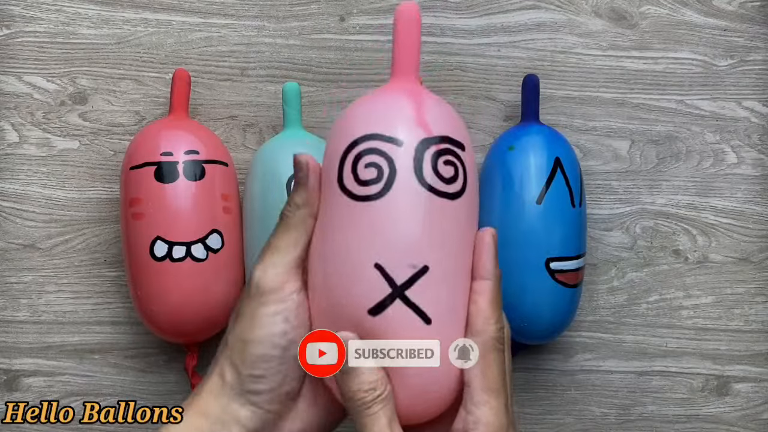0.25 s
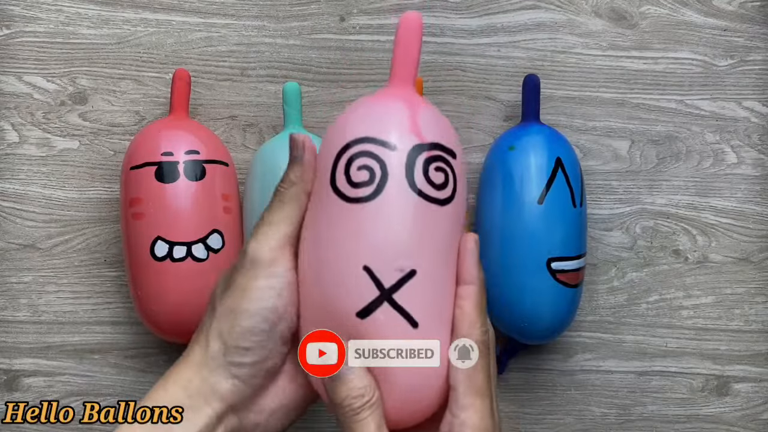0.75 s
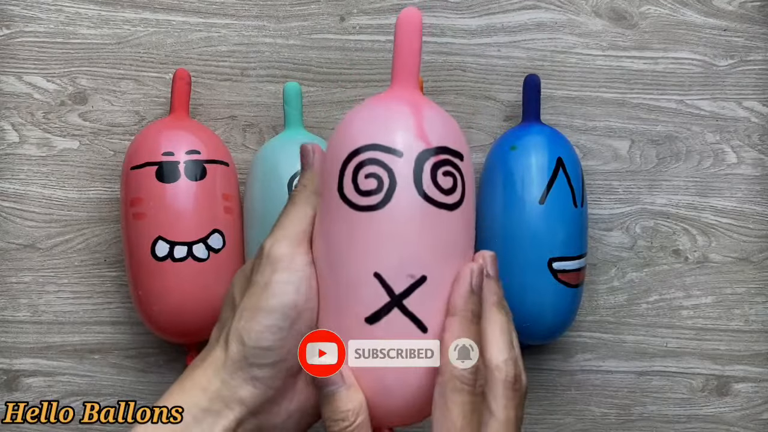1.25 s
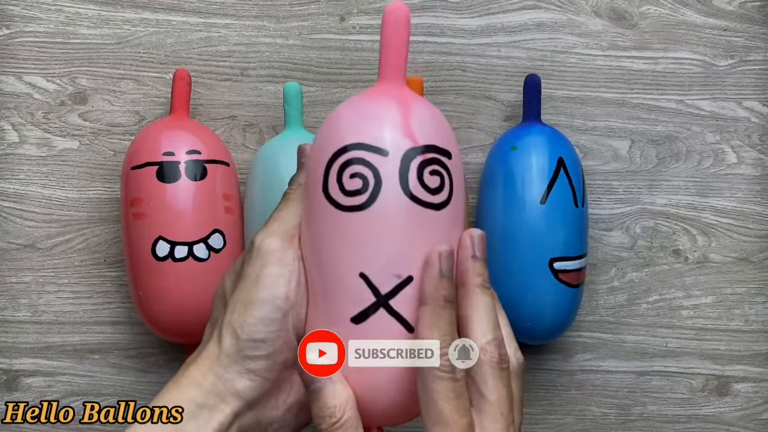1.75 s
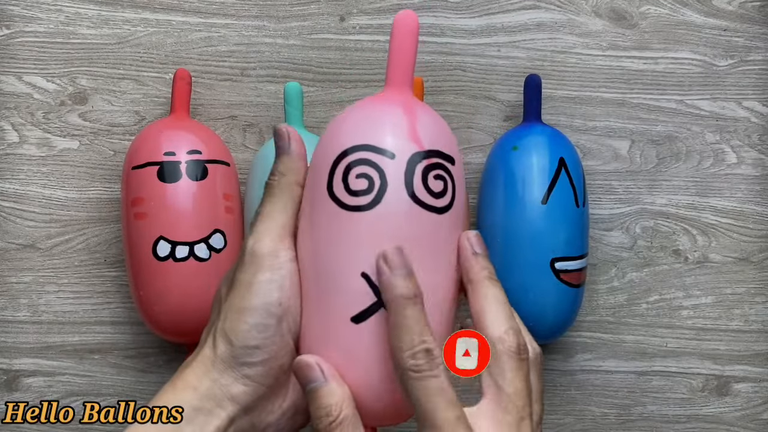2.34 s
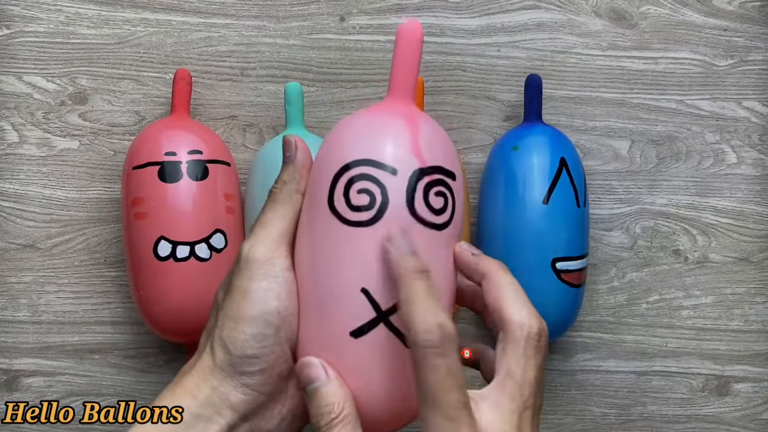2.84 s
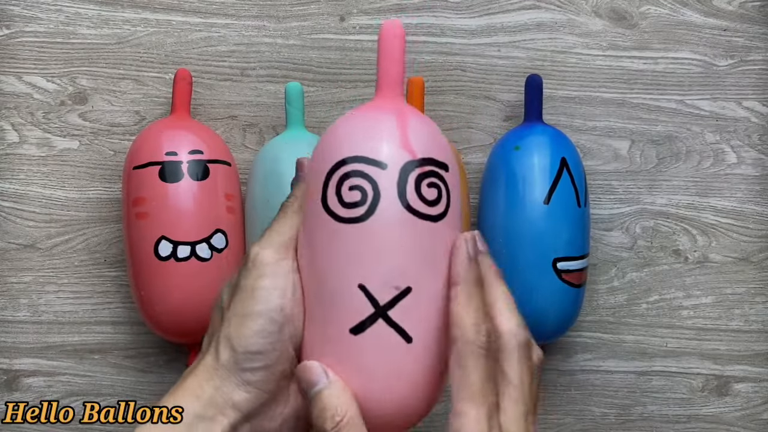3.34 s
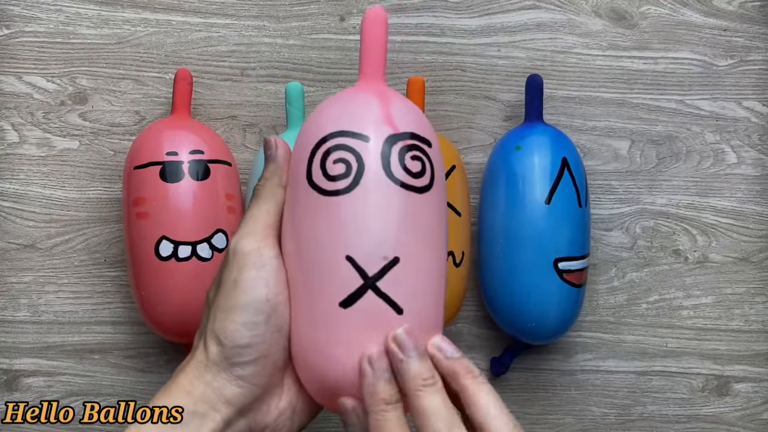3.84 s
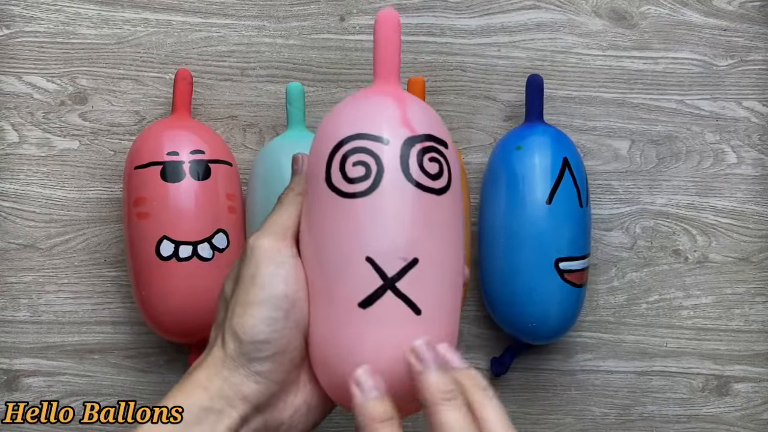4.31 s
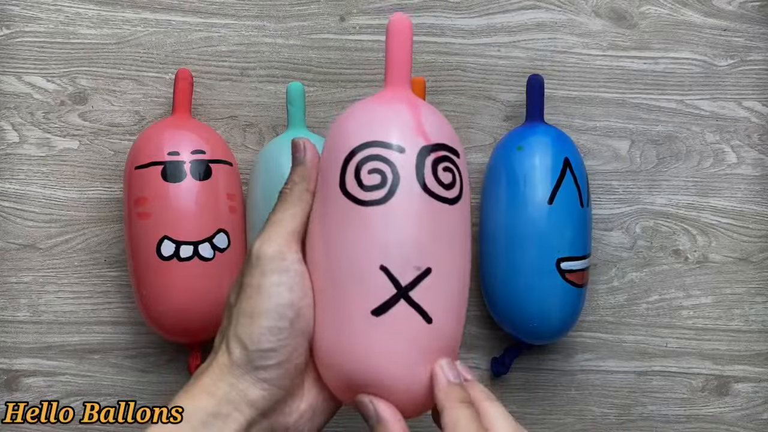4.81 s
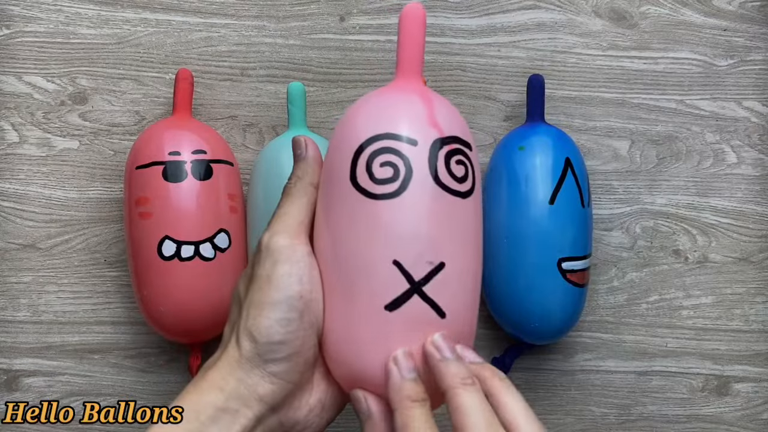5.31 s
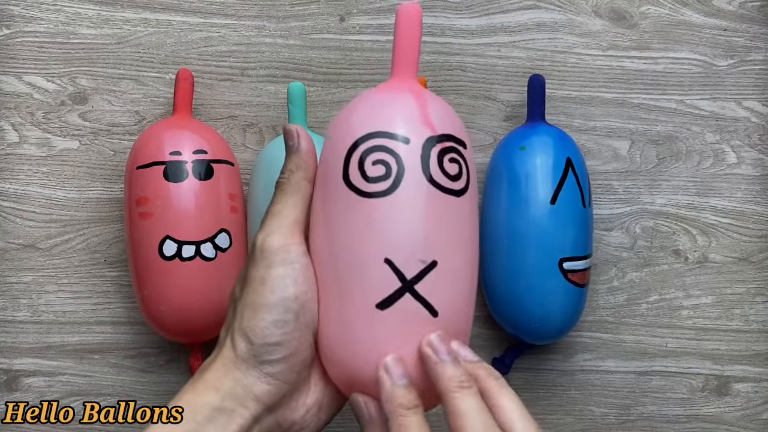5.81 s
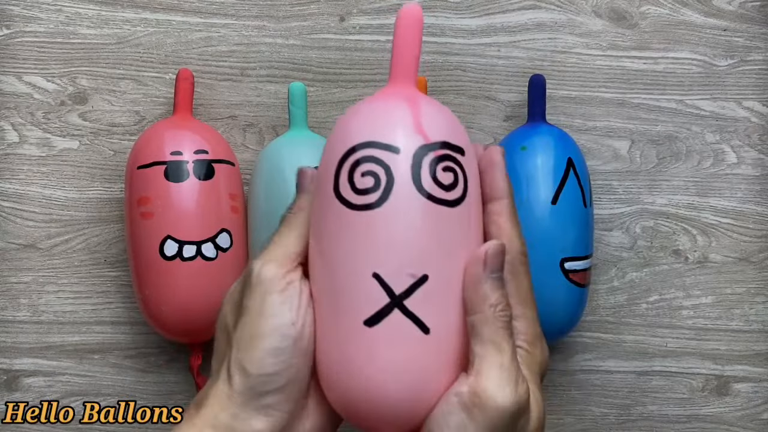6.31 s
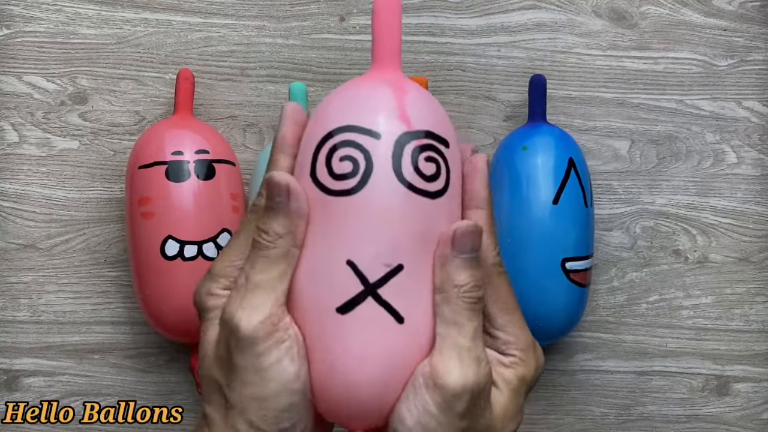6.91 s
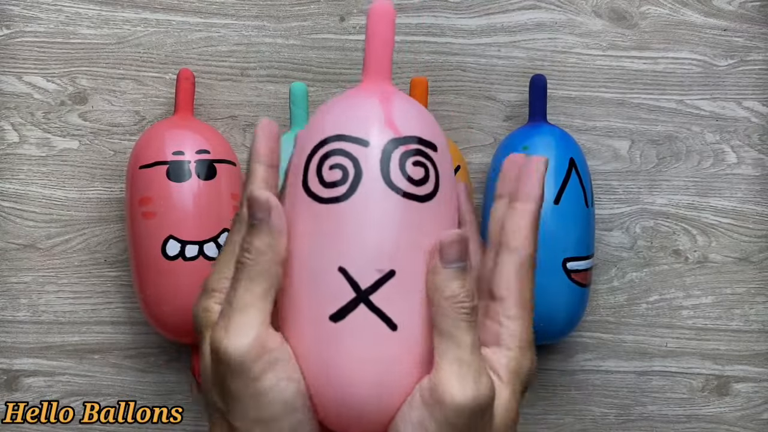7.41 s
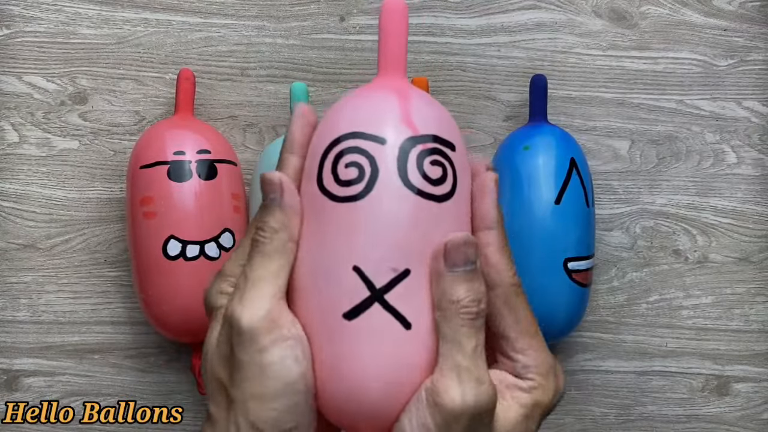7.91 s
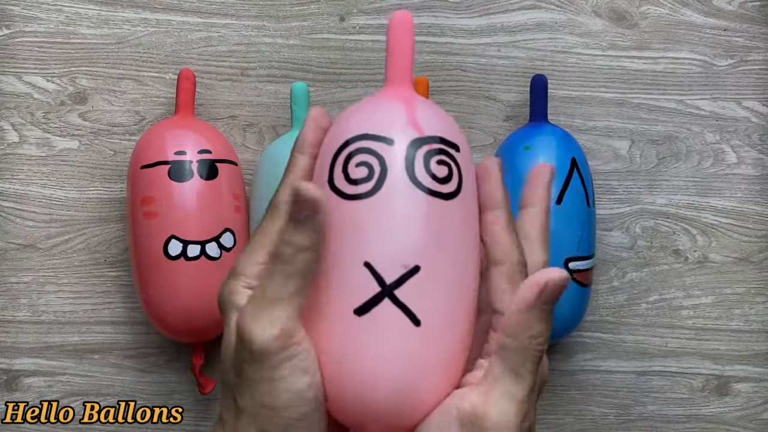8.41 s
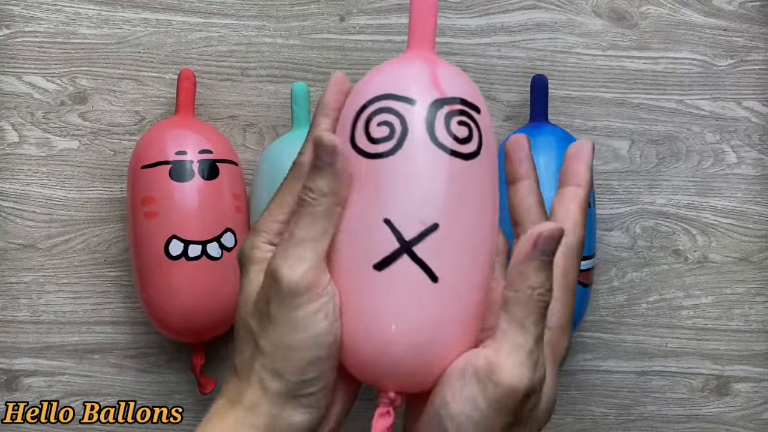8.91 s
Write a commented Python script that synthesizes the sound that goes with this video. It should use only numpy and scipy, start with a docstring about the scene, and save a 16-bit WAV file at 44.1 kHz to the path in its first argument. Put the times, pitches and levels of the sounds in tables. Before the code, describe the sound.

Fingers rub and squeeze a taut latex balloon up close, giving rubbery stuttering creaks, blunt knocks and short squeaks in irregular bursts, in a small dry room.

```python
"""Two hands squeeze and rub a taut latex balloon just below a stereo microphone in a small, dry room.
Rubs come first: fast, slowing runs of finger slips with fine crackle. Soft creaks and a low rumble run throughout.
Single slips soon join in. Each sends a wave round the skin, treble first: a tiny falling chirp, or a blunt knock.
From 1.5 s light fingertips squeak in gliding notes, and from 2.5 s skin peeling loose adds a few thin ticks.
Rubs and slips mix until the end, with slips leading from 7.7 s; the balloon and the air inside ring briefly."""
import sys
import numpy as np
from scipy import signal
from scipy.fft import rfft, irfft, next_fast_len
from scipy.io import wavfile
from scipy.ndimage import uniform_filter1d

SR = 44100
rng = np.random.default_rng(int(sys.argv[2]) if len(sys.argv) > 2 else 0)


def log_audio(samples):
    """Write samples as a 16-bit WAV file to the path given in sys.argv[1]."""
    # one column per channel
    frames = np.atleast_2d(samples).T
    # limit to full scale, then quantise
    limited = np.clip(frames, -1, 1)
    pcm = np.round(limited * 32767).astype(np.int16)
    wavfile.write(sys.argv[1], SR, pcm)


N = 403497
T = np.arange(N) / SR  # s
SIZE = 4096  # samples in a short sound or filter
TOP_HZ = 15600  # nothing is wanted above this


def amp(db):
    """Turn decibels into a gain."""
    return 10 ** (np.asarray(db) / 20)


def unit(x):
    """Scale to an rms of one."""
    return x / np.sqrt(np.mean(x ** 2))


def peak(x):
    """Scale to a peak of one."""
    return x / np.abs(x).max()


def curves(table, t=T):
    """Join the points of each table column by straight lines in time."""
    s, *columns = np.transpose(table)
    return [np.interp(t, s, c) for c in columns]


def add(out, start, x):
    """Mix x into out from a time in seconds."""
    i = max(int(start * SR), 0)
    out[..., i:i + x.shape[-1]] += x[..., :max(N - i, 0)]


def ring(x, response):
    """Pass x through an impulse response."""
    return signal.oaconvolve(x, response)[:len(x)]


def butter(order, hz, kind):
    """Make a smooth filter that keeps the low, high or middle notes."""
    return signal.butter(order, hz, kind, fs=SR, output="sos")


def colour(points):
    """Make an impulse response with a given spectrum that starts at once (minimum phase)."""
    hz, db = np.transpose(points)
    f = np.arange(SIZE // 2 + 1) * SR / SIZE
    gain = amp(np.interp(np.log(f + 1), np.log(hz), db))
    # folding the cepstrum forward removes everything before the start
    cepstrum = irfft(np.log(gain))
    cepstrum[1:SIZE // 2] *= 2
    cepstrum[SIZE // 2 + 1:] = 0
    return irfft(np.exp(rfft(cepstrum)))


def even(x, span_s=0.037):
    """Hold the short-term level near one and keep the finer grain."""
    power = np.abs(uniform_filter1d(x ** 2, int(span_s * SR)))
    return x / np.sqrt(power + np.mean(x ** 2) / 100)


# spectrum of the room's rumble: f/Hz, relative level/dB
ROOM_TONE = [(15, -31.5), (25, 15.5), (77, 8.5), (163, -1.5), (404, -4.5), (501, -11), (673, -10.5),
             (1420, -31.5), (6040, -40.5), (8550, -47.5), (9770, -38.5), (15000, -60.5)]


def room_tone(level_db=-53.5, side_db=-11, low_cut_hz=45):
    """The quiet rumble of the room: coloured noise, nearly alike on both sides."""
    response = signal.sosfilt(butter(4, low_cut_hz, "high"), colour(ROOM_TONE))
    mid, side = (unit(ring(rng.standard_normal(N), response)) for _ in range(2))
    return amp(level_db) * (mid + amp(side_db) * np.outer([1, -1], side))


def room(x, wet_db=-14, t60=0.25, bright_db=-10, bright_t60=0.16, split_hz=1500):
    """A short tail of fading noise, different at each microphone; the walls send back more treble than bass."""
    t = T[:SR // 2]
    low_pass = butter(2, split_hz, "low")
    out = []
    for noise in rng.standard_normal((2, len(t))):
        low = signal.sosfilt(low_pass, noise)
        tail = 0
        for band, db, seconds in (low, wet_db, t60), (noise - low, bright_db, bright_t60):
            fade = np.exp(-np.log(1000) * t / seconds) * (t > .004)
            tail = tail + amp(db) * band * fade / np.linalg.norm(fade)
        out.append(ring(x, tail))
    return np.array(out)


# where the fingers work: t/s, head start of the low notes on the left/ms, left minus right level/dB
# (the level difference holds in full only for the upper middle)
PLACE = [(0, 0.11, 4.5), (2.4, 0.15, 4.5), (5.3, 0.13, 3), (8.2, 0.1, 2.5)]


def microphones(x, split_hz=1800, near_low_hz=920, near_high_hz=5000, bass_pan=0.19):
    """Low notes reach the left first; treble leaves the whole skin, a quarter cycle apart between sides."""
    lead_ms, pan_db = curves(PLACE)
    low = signal.sosfiltfilt(butter(2, split_hz, "low"), x)
    treble = signal.hilbert(x - low, next_fast_len(N))[:N]
    later = np.interp(T - lead_ms / 1000, T, low)
    pair = np.array([low + treble.real, later + treble.imag])
    # the upper middle favours the nearer microphone most; the rest gets only a share of the difference
    middle = signal.sosfiltfilt(butter(2, [near_low_hz, near_high_hz], "band"), pair)
    side_db = np.array([pan_db, -pan_db]) / 2
    return middle * amp(side_db) + (pair - middle) * amp(bass_pan * side_db)


# lasting notes of the balloon and the air inside: f/Hz, time to fall by 60 dB/s, relative level/dB
RINGS = [(251.6, 0.34, -4), (418.5, 0.16, -2), (709, 0.14, -11.5), (1568, 0.19, 3), (2895, 0.2, -0.5),
         (3130, 0.35, -5), (5200, 0.29, -0.5)]


def cavity(x):
    """The balloon and its air ring on at a few fixed notes, each dying away at its own pace."""
    t = T[:SR // 3]
    response = 0
    for hz, t60, db in RINGS:
        decay = np.log(1000) / t60
        note = np.exp(-decay * t) * np.cos(2 * np.pi * hz * t)
        response = response + amp(db) * 2 * decay / SR * note
    return ring(x, response)


# how tightly the skin is stretched: t/s, shift of its resonances/semitones
TENSION = [(.04, -1), (.11, 1), (.2, -1.5), (.45, -0.2), (.63, -0.77), (.69, 1.3), (.76, -1), (.82, 0.4),
           (2.1, 0), (4.1, 1), (5.2, .5), (5.9, 1), (6.8, -1), (7.1, -1.5), (7.3, 0), (7.9, -0.17)]


def tension(t):
    """The factor by which the stretch of the skin raises its resonances."""
    return 2 ** (curves(TENSION, t)[0] / 12)


def wave(shape, shift=.1, patchy_db=3.0, turns=1.6, scatter=0.2164, knee_hz=70, lap=4.4, lap_db=-11):
    """One slip crosses the skin: each spot has its own tension and colour, and low notes travel slowest."""
    hz, db = np.transpose(shape)
    spot_hz = hz * np.exp(shift * rng.standard_normal())
    spot_db = db + patchy_db * rng.standard_normal(len(db))
    spot = colour(np.c_[spot_hz, spot_db])
    f = np.arange(SIZE // 2 + 1) * SR / SIZE
    # a phase that grows with log frequency delays the bass most
    phase = 2 * np.pi * turns * np.exp(scatter * rng.standard_normal()) * np.log(1 + f / knee_hz)
    first = np.exp(-1j * phase)
    # the wave comes round once more, weaker and more drawn out
    again = amp(lap_db) * np.exp(-1j * lap * phase)
    return unit(irfft(rfft(spot) * (first + again)))


# typical spectrum of the taut skin, in creaks and in rubs: f/Hz, relative level/dB
SKIN = [(150, -25), (330, -8.5), (425, -1), (505, -11.5), (610, 10), (760, 3), (950, -7.5), (1350, -28.5),
        (1590, -25), (1900, -34), (2800, -34), (4000, -42.5), (12000, -90.5)]


def creaks(level_db=-45, spread_db=3, per_s=14, swell_s=0.0023):
    """The holding hand never rests: short puffs of noise shake the skin softly at random moments."""
    out, t = np.zeros(N), T[:SIZE]
    swell = t / swell_s * np.exp(-t / swell_s)
    for along, size in rng.random((int(per_s * N / SR), 2)):
        creak = ring(swell * rng.standard_normal(SIZE), wave(SKIN, shift=0.088, patchy_db=0.0))
        add(out, along * T[-1], amp(level_db + spread_db * (2 * size - 0.5)) * peak(creak))
    return out


# sticky skin peeling off the latex: t/s, peak level/dB
PEELS = [(2.4978, -35), (8.0719, -44), (8.2626, -35), (8.322, -44)]


def peels(tick_s=0.0018, low_hz=9000):
    """Skin that comes unstuck gives a thin, very high tick: a brief swell of noise without its lows."""
    out, t = np.zeros(N), T[:SIZE]
    high_pass = butter(4, low_hz, "high")
    for s, db in PEELS:
        swell = t / tick_s * np.exp(-t / tick_s)
        tick = signal.sosfilt(high_pass, swell * rng.standard_normal(SIZE))
        add(out, s, amp(db) * peak(tick))
    return out


# spectrum of the crackle of the contact: f/Hz, relative level/dB
CRACKLE = [(300, -13.5), (1250, 19), (1600, -2), (1950, 10), (2400, 9.5), (2900, 8.5), (3700, 1.5),
           (6000, -0.5), (8300, -9), (10000, -3), (12200, -23), (14000, -8.5), (16000, -30.5)]


def crackle_colour():
    """The filter that gives noise the sound of skin catching on latex."""
    return colour(CRACKLE)


# fingertip squeaks: t/s, length/s, starting f/Hz, final f/Hz, level/dB,
# overtone fall/dB per octave, rasp level against the note/dB
SQUEAKS = [(1.547, 0.009, 854, 1630, -45.5, 15, -6), (1.885, 0.01, 990, 1800, -47.5, 5, -4),
           (2.247, 0.011, 1680, 2250, -52, 3.5, -8), (3.173, .011, 952, 1411, -44.5, 6.5, -18),
           (3.234, 0.011, 1600, 3794, -46, 1.5, -11), (3.413, 0.056, 608, 1600, -43, 11, -12),
           (3.461, 0.047, 540, 1414, -39, 9, -17), (4.226, 0.029, 954, 1644, -47.5, 13, -16),
           (4.471, 0.03, 1895, 1703, -50, 12, -5.5), (5.583, 0.038, 1440, 1723, -47.5, 17, -11.5),
           (5.654, 0.033, 1045, 515, -44, 13, -17), (6.022, 0.012, 657.4, 1160, -41.5, 7, -8),
           (6.318, 0.049, 2145, 2068, -48, 25, -0.5), (6.409, 0.016, 5870, 4537, -50.5, -21, 6.5),
           (8.483, 0.0064, 4080, 2720, -53.5, 12, 7)]


def squeaks(rough=0.11, shimmer=0.23, mellow_hz=4500, count=5):
    """Light, fast slips make a gliding, hoarse note that rasps once a cycle; latex swallows high overtones."""
    out, crackle = np.zeros(N), crackle_colour()
    for s, length, first_hz, last_hz, db, fall_db, rasp_db in SQUEAKS:
        u = np.linspace(0, 1, int(length * SR))
        chance = rng.standard_normal((3, SIZE))[:, :len(u)]
        waver, grip = unit(uniform_filter1d(chance[:2], SR // 1000))
        # the raspier the note, the less steady its pitch
        hz = (first_hz + (last_hz - first_hz) * u) * np.exp(rough * np.sqrt(amp(rasp_db)) * waver)
        phase = 2 * np.pi * np.cumsum(hz) / SR
        note = 0
        for k in range(1, count + 1):
            swallowed = (k * hz < TOP_HZ) / (1 + (k * hz / mellow_hz) ** 4)
            note = note + amp(-fall_db * np.log2(k)) * np.sin(k * phase) * swallowed
        rasp = ring(chance[2] * (1 + np.cos(phase)), crackle)
        swell = unit(np.sqrt(u * (1 - u)) * np.exp(shimmer * grip))
        add(out, s, amp(db) * swell * (unit(note) + amp(rasp_db) * unit(rasp)))
    return out


# rubbing strokes: t/s, attack/s, hold/s, relative skin level/dB, swell over the hold/dB,
# relative deep wobble level/dB, relative crackle level/dB, top rate of slips/per s (typical), irregularity/0-1
RUBS = [(0.0, 0.051, 0.15, -25.5, -10.5, -30, -60, 345, 0.18),
        (0.324, 0.023, 0.05, -30.5, -5.5, -46, -80, 280, 0.5),
        (0.599, 0.033, 0.15, -26.5, -15.5, -27, -64.5, 391, .14),
        (0.769, 0.038, 0.019, -22.5, 0.5, -25, -75, 224, 0.39),
        (0.93, 0.014, 0.3, -66, 1, -72, -75, 360, 0.3),
        (2.463, 0.024, 0.0073, -30.5, 10.5, -37.5, -44.5, 303, 0.54),
        (2.704, 0.013, 0.0046, -32.5, -6, -47, -52.5, 307, 0.62),
        (3.112, 0.0067, 0.0096, -29, -3, -42, -57, 392, 0.39),
        (3.732, 0.015, 0.037, -30.5, 11, -37.5, -57, 437, 0.42),
        (3.835, 0.0097, 0.15, -35, 13, -38.5, -61.5, 320, 0.46),
        (4.093, 0.0072, 0.05, -25.5, 0.5, -39, -51, 377, 0.46),
        (4.22, 0.021, 0.015, -36.5, -8.5, -51, -54, 285, 0.4),
        (4.55, 0.013, 0.15, -33, -1, -37, -53.5, 289, 0.51),
        (4.731, .011, 0.074, -23.5, -9, -30, -50.5, 309, 0.42),
        (5.133, 0.014, 0.043, -35, 9.5, -45, -59.5, 226, 0.43),
        (5.211, 0.0096, 0.085, -29.5, 0, -38.5, -57, 227, 0.35),
        (5.35, 0.024, 0.079, -26.5, 6, -33.5, -52, 218, 0.46),
        (5.804, .02, 0.11, -25, -3, -31.5, -49, 273, 0.41),
        (5.931, 0.01, 0.049, -39, -12, -61, -56.5, 223, 0.4),
        (6.086, .012, .15, -40.5, -16, -44, -68.5, 260, 0.45),
        (6.286, 0.025, 0.038, -29, -5, -42.5, -74, 366, 0.34),
        (6.387, 0.028, 0.13, -59.5, -23, -53.5, -72.5, 326, 0.38),
        (6.8, 0.017, 0.075, -34.5, -3, -37.5, -67, 202, 0.61),
        (6.899, 0.011, 0.25, -34, 9, -44.5, -62, 320, 0.62),
        (7.163, 0.012, 0.063, -36, 6, -40, -60.5, 243, 0.57),
        (7.345, 0.015, 0.046, -46.5, -7, -52, -66, 224, 0.63),
        (7.456, .02, 0.041, -48, -8, -48.5, -71, 217, 0.58),
        (7.997, 0.011, 0.098, -58, 3, -54, -71.5, 176, 0.68),
        (8.949, 0.0096, 0.096, -46.5, -1, -52, -77.5, 228, 0.7)]


def drag(t=T, rush_share=.36, rush_octaves=.45, sag_octaves_per_s=8.5):
    """Slips a second and their irregularity: a finger speeds up early in the hold, then slows as it digs in."""
    points = []
    for s, attack, hold, *_, rate, uneven in RUBS:
        rush = rush_share * hold
        last_rate = rate / 2 ** (sag_octaves_per_s * (hold - rush))
        points += [(s + attack, rate / 2 ** rush_octaves, uneven),
                   (s + attack + rush, rate, uneven),
                   (s + attack + hold, last_rate, uneven)]
    return curves(sorted(points), t)


def catching(depth_db=5.0, span_s=0.012):
    """An uneven drag catches and eases, so its level wanders in small separate grains."""
    span = int(span_s * SR)
    wander = unit(uniform_filter1d(uniform_filter1d(rng.standard_normal(N), span), span))
    return amp(depth_db * drag()[1] * np.clip(wander, -2, 1.5))


def strokes(attack_db=19.5, release_db_per_s=855, wobble_edge=0.96, wobble_swell=0.41,
            crackle_swell=0.36, breakup_db=30, smooth_below=0.25):
    """Levels of skin, wobble and crackle: attack, sloping hold, release; a smooth drag gains crackle."""
    gains = np.zeros((3, N))
    for s, attack, hold, skin_db, swell_db, wobble_db, crackle_db, _, uneven in RUBS:
        t = T[:SR // 2] - attack
        edge_db = attack_db * np.minimum(t / attack, 0) - release_db_per_s * np.maximum(t - hold, 0)
        along = np.clip(t / hold, 0, 1) - .5
        breakup = breakup_db * max(1 - uneven / smooth_below, 0)
        skin = skin_db + edge_db + swell_db * along
        wobble = wobble_db + wobble_edge * edge_db + wobble_swell * swell_db * along
        crackle = crackle_db + edge_db + (crackle_swell * swell_db + breakup) * along
        add(gains, s, amp([skin, wobble, crackle]))
    return uniform_filter1d(gains, SR // 400) * catching()


def stick_slip(scatter_db=3.0):
    """The finger sticks and lets go at uneven intervals; a longer hold gives a stronger slip."""
    rate, uneven = drag()
    pulses, i = np.zeros(N), 0
    for gap, size in rng.standard_normal((N // 50, 2)):
        hold = np.exp(uneven[i] * np.clip(gap, -2, 2))
        i += int(hold * SR / rate[i]) + 1
        if i >= N:
            break
        pulses[i] = np.sqrt(hold) * amp(scatter_db * uneven[i] * size)
    return pulses


def roam(pulses, shape, count=24, hop=1.4, wide_drag=.4):
    """Each slip sounds from the spot under the finger; uneven drags hop further, tighter skin rings higher."""
    spots = [wave(shape, shift=0.13 * far, patchy_db=6.9 * far, scatter=0.2946 * far)
             for far in np.linspace(.1, 1.1, count)]
    at = np.flatnonzero(pulses)
    uneven = drag(T[at])[1]
    hops, places = rng.random((N // 50, 2))[:len(at)].T
    visits = np.cumsum(hops < hop * uneven) % len(at)
    # an even drag stays near the middle
    reach = np.clip(uneven / wide_drag, 0, 1) ** 2
    chosen = (count * places[visits] * reach).astype(int)
    out = np.zeros(N)
    steps = np.arange(SIZE)
    for i, spot, taut in zip(at, chosen, tension(T[at])):
        add(out, T[i], pulses[i] * np.interp(steps * taut, steps, spots[spot], right=0))
    return even(out, span_s=0.026)


# change of the crackle's top octave, higher under a flat palm than under fingertips: t/s, level/dB
SHEEN = [(.15, 4.5), (1.15, 15), (2.5, 6), (4.7, -1), (5.9, -0.5), (6.3, 23.5), (6.9, 4), (8.9, 24)]


def sheen(x, split_hz=8500):
    """Raise or lower the very top of the crackle."""
    top = signal.sosfiltfilt(butter(2, split_hz, "high"), x)
    return x + (amp(curves(SHEEN)[0]) - 1) * top


# typical spectrum of the wobble of the whole balloon: f/Hz, relative level/dB
WOBBLE = [(25, -34), (55, -10), (105, 3), (240, 2.5), (390, 0.5), (520, -19), (900, -58), (4000, -77.5)]
# typical spectrum of the skin's bark under a hard fingertip: f/Hz, relative level/dB
BARK = [(300, -50.5), (800, -9), (1080, 8), (1350, -4), (1650, 3), (2000, -22.5), (2700, -27.5), (2950, -8),
        (3700, -33), (8000, -49)]
# the bark against the skin: t/s, relative level/dB
BARK_LEVEL = [(0, -12), (.065, -15), (.12, -21), (.4, -16.5), (.7, -19.5), (3.1, -22.5), (4.1, -14),
              (4.7, -12.5), (5.4, -16), (5.9, -14), (6.85, -23.5), (7.15, -12.5), (7.8, -16), (8.7, -19.5)]


def rubs(skin_db=-0.36, crackle_db=6.5, burst_s=0.0065, grain_db=4.5, low_cut_hz=115):
    """Runs of slips, too quick to stir the deepest wobble, drive the skin; each sheds a burst of crackle."""
    skin_gain, wobble_gain, crackle_gain = strokes()
    pulses = stick_slip()
    bursts = ring(pulses, np.exp(-T[:SIZE] / burst_s))
    grains = rng.standard_normal(N) * amp(grain_db * np.minimum(rng.exponential(size=N), np.pi))
    crackle = sheen(even(ring(grains * bursts, crackle_colour())))
    skin = roam(pulses, SKIN)
    wobble = signal.sosfilt(butter(4, low_cut_hz, "high"), roam(pulses, WOBBLE))
    body = amp(skin_db) * skin_gain * skin + wobble_gain * wobble
    bark = amp(curves(BARK_LEVEL)[0]) * skin_gain * roam(pulses, BARK)
    return body + bark + amp(crackle_db) * crackle_gain * crackle


# high notes that a snap leaves ringing in the stretched latex:
# typical f/Hz, time to fall by 60 dB/s, relative level/dB
PINGS = [(1653, 0.11, -0.5), (3003, 0.053, -11)]


def ping(spread_db=4.0, detune=.018):
    """The high notes of the latex fade away; their balance and tuning change with every grip."""
    t = T[:SIZE]
    chance = rng.standard_normal((len(PINGS), 2))
    out = 0
    for (hz, t60, db), (size, stretch) in zip(PINGS, chance):
        fade = amp(db + spread_db * size - 60 * t / t60)
        out = out + fade * np.sin(2 * np.pi * hz * (1 + detune * stretch) * t)
    return out


# single slips of a finger: t/s, peak level of the skin/dB, grip/0-1, relative snap level/dB
SLIPS = [(.326, -27, 0.46, -49), (0.343, -20, 0.57, -48), (.376, -20.5, 0.7, -48),
         (0.414, -20.5, 0.76, -45.5), (0.427, -22, 0.44, -58), (0.446, -20, 0.6, -50.5),
         (0.461, -19, 0.27, -68), (0.481, -16, 0.59, -45), (.806, -15.5, 0.57, -45), (.823, -19, 0.17, -47),
         (0.864, -16.5, 0.78, -53), (0.907, -17, 0.73, -53.5), (1.14, -33.5, 0.45, -45),
         (1.172, -21, 0.98, -60), (1.18, -16, 0.82, -45), (1.215, -16.5, 0.93, -47.5),
         (1.254, -16, 0.77, -53), (1.261, -18.5, 0.63, -68), (1.276, -20.5, 1, -70),
         (1.287, -14, 0.47, -52), (1.294, -27.5, 0.8, -60), (1.313, -18.5, 0.9, -58),
         (1.374, -14.5, 0.84, -59), (1.687, -16, 0.88, -67), (1.708, -13, 0.88, -51.5),
         (1.73, -22, 0.96, -59), (1.746, -17.5, 0.84, -61), (1.766, -22, 1, -56.5), (1.797, -23, 0.96, -57),
         (2.049, -14.5, 0.85, -51.5), (2.059, -16, 0.92, -57), (2.074, -20.5, 0.9, -61),
         (2.088, -18, 0.78, -60), (2.123, -18.5, 0.87, -60), (2.355, -34.5, 0.48, -53),
         (2.446, -31, 0.9, -52), (2.468, -26, 0.89, -53), (2.65, -32, 0.67, -55.5),
         (2.867, -31.5, 0.45, -57), (2.92, -25.5, 0.66, -56), (2.926, -19.5, 0.46, -40.5),
         (2.967, -22, 1, -55), (2.997, -19, .9, -54), (3.025, -21.5, 0.72, -56), (3.033, -17.5, 0.6, -71),
         (3.055, -18.5, 0.65, -50), (3.08, -20.5, 0.58, -59), (3.113, -23, 0.36, -44),
         (3.122, -20.5, 0.61, -38), (3.313, -12, 0.91, -46), (3.344, -16.5, 0.8, -58),
         (3.358, -18, 0.47, -49), (3.393, -19.5, 0.43, -53), (4.001, -21, 1, -47), (4.096, -19, 0.83, -37),
         (4.11, -14, 0.64, -39), (4.187, -23.5, 1, -52), (4.27, -22, 0.95, -63), (4.304, -23.5, 0.83, -62),
         (4.496, -30, 0.17, -50), (4.564, -26, .7, -52), (4.737, -17.5, 0.65, -39),
         (4.885, -14.5, 0.81, -50), (4.893, -21.5, 1, -60), (4.922, -19, 0.96, -45.5),
         (5.334, -25.5, 1, -45), (5.367, -20.5, 0.51, -55), (5.404, -16.5, 0.7, -60), (5.434, -21, 1, -43),
         (5.468, -16.5, 0.67, -38.5), (5.489, -19.5, 0.63, -50), (5.772, -29, 0.36, -51),
         (5.857, -16.5, 0.72, -35), (6.075, -24, 0.89, -52), (6.092, -21.5, 0.8, -51),
         (6.134, -19, 0.54, -46), (6.16, -27.5, 0.6, -58), (6.215, -29.5, 0.5, -57),
         (6.248, -27.5, 0.27, -49), (6.418, -28.5, 0.96, -53), (6.743, -33.5, 0.77, -77),
         (6.755, -26.5, 0.63, -69), (6.777, -28, 0.55, -74), (6.905, -27, 0.62, -50),
         (6.962, -25.5, 0.5, -55), (6.984, -22, 0.48, -50), (7.031, -25, 0.56, -59),
         (7.058, -22, 0.63, -56), (7.102, -22, 0.52, -64), (7.125, -17, 0.58, -47),
         (7.145, -20.5, 0.62, -41.5), (7.17, -20.5, 0.66, -49), (7.245, -22, 1, -51),
         (7.258, -26.5, 1, -45), (7.271, -20, 0.99, -43), (7.28, -24, 0.98, -53), (7.29, -22, 0.99, -48),
         (7.301, -27, 0.93, -52), (7.318, -23, 0.86, -55), (7.47, -36.5, 0.89, -54),
         (7.727, -28, 0.26, -62), (7.771, -28.5, 0.52, -64), (7.795, -23, 0.32, -53),
         (7.826, -21.5, 0.5, -51), (7.845, -16.5, 0.99, -42), (7.861, -19, 0.97, -48),
         (7.874, -21.5, 1, -47), (7.887, -22.5, 0.28, -60), (7.916, -24, 0.8, -48),
         (7.945, -18.5, 0.3, -46.5), (7.955, -17.5, 0.89, -48), (7.97, -17, 0.01, -49),
         (7.983, -20.5, 0.9, -51), (8.073, -35, 0.41, -46.5), (8.264, -18.5, 0.55, -46),
         (8.274, -25.5, .65, -46), (8.326, -24, 0.76, -47.5), (8.453, -34, 0.5, -54.5),
         (8.497, -24.5, 1, -45), (8.514, -17, 0.9, -46), (8.531, -24.5, 0.93, -42), (8.706, -18, 1, -41),
         (8.715, -18.5, 0.98, -62), (8.731, -24.5, 1, -53), (8.739, -19, 0.5, -39),
         (8.908, -19.5, 0.97, -47.5), (8.937, -20, 1, -45), (8.946, -24, 0.84, -46)]
# typical spectrum of the skin under one firm slip: f/Hz, relative level/dB
SLIP_SKIN = [(150, -15), (330, -4.5), (430, -6.5), (510, -8.5), (620, 9.5), (790, -0.5), (1000, -8),
             (1300, -19), (1600, -40), (2000, -38.5), (4000, -45), (12000, -94)]


def slips(light_db=-27, firm_db=2, snap_db=-1.5, ping_db=-5, snap_s=0.016, rise_s=0.00088,
          lead_s=0.001175, firm_grip=0.71, knock_hz=700, knock_s=0.0063, damp_s=0.052,
          wobble_damp_s=0.075, scrape_db=-15, scrape_s=0.0086, bark_db=-2):
    """A firm slip chirps and shakes the balloon until the palm damps it; a light one is a blunt knock."""
    out = np.zeros(N)
    crackle, t = crackle_colour(), T[:SIZE]
    onset = 1 - np.exp(-t / rise_s)
    swell = (t / knock_s) ** 2 * np.exp(-(t / knock_s) ** 2)
    for s, db, grip, bright_db in SLIPS:
        # the firmer the grip, the deeper the wobble and the clearer the chirp
        deep_db = db + light_db + grip * (firm_db - light_db)
        firm = min(grip / firm_grip, 1)
        taut = tension(s)
        chirp = wave(np.multiply(SLIP_SKIN, [taut, 1]), shift=0.045, patchy_db=3.5, turns=1.35,
                     scatter=0.2365, lap_db=-6.0) * np.exp(-t / damp_s)
        wobble = wave(WOBBLE, shift=0.097, patchy_db=5.0, turns=1.35, lap_db=-9.5)
        wobble = wobble * np.exp(-t / wobble_damp_s)
        hz = knock_hz * taut * np.exp(0.04 * rng.standard_normal())
        knock = swell * np.sin(2 * np.pi * hz * t)
        # the finger scrapes on for a moment before it sticks again
        friction = onset * np.exp(-t / scrape_s) * rng.standard_normal(SIZE)
        scrape = amp(scrape_db) * peak(ring(friction, chirp))
        bark = amp(bark_db + curves(BARK_LEVEL, s)[0]) * peak(ring(friction, wave(BARK)))
        skin = firm * (peak(chirp) + bark) + (1 - firm) * peak(knock) + scrape
        rasp = np.exp(-t / snap_s) * unit(ring(rng.standard_normal(SIZE), crackle))
        snap = onset * (rasp + amp(ping_db) * ping())
        # begin a little early, as the sound takes a moment to swell
        start = s - lead_s
        add(out, start, amp(db) * peak(skin))
        add(out, start, amp(deep_db) * peak(wobble))
        add(out, start, amp(bright_db + snap_db) * snap)
    return out


def scene(rub_ring_db=3, touch_ring_db=-1.5):
    """Rubs and touches set the balloon ringing, long rubs more than short touches, in the quiet room."""
    rubbing = rubs()
    touches = slips() + squeaks() + peels() + creaks()
    ringing = cavity(amp(rub_ring_db) * rubbing + amp(touch_ring_db) * touches)
    balloon = rubbing + touches + ringing
    return microphones(balloon) + room(balloon) + room_tone()


def record(dry, low_cut_hz=36):
    """Cut the deepest bass gently and everything above the top limit steeply."""
    dry = signal.sosfilt(butter(6, low_cut_hz, "high"), dry)
    return signal.sosfilt(signal.ellip(8, .2, 70, TOP_HZ, fs=SR, output="sos"), dry)


dry = scene()
out = record(dry)
log_audio(out)
```